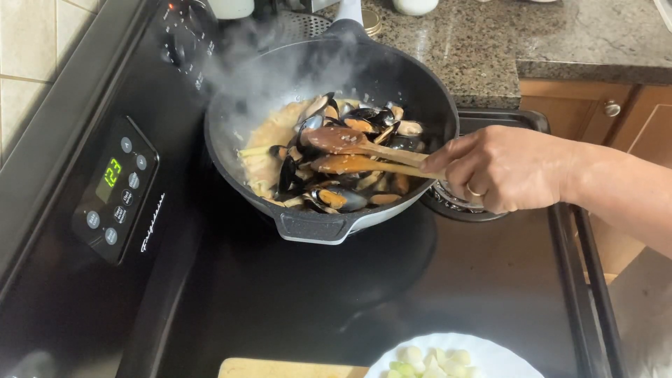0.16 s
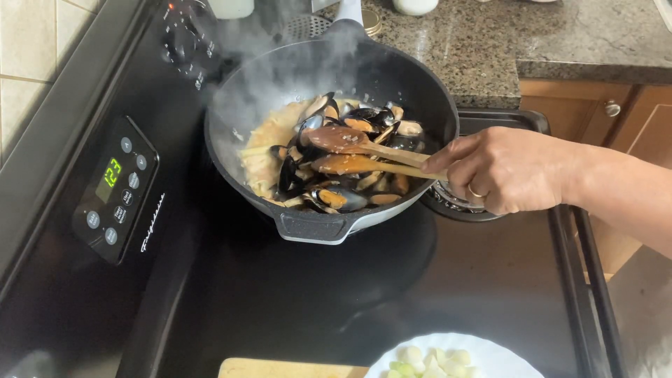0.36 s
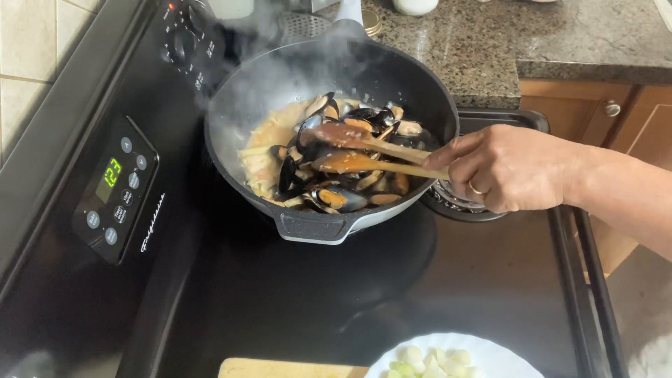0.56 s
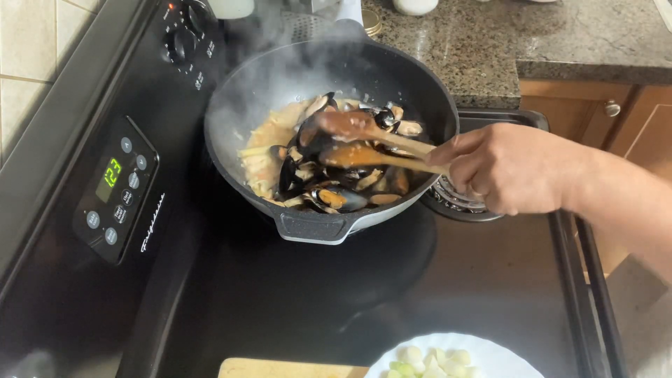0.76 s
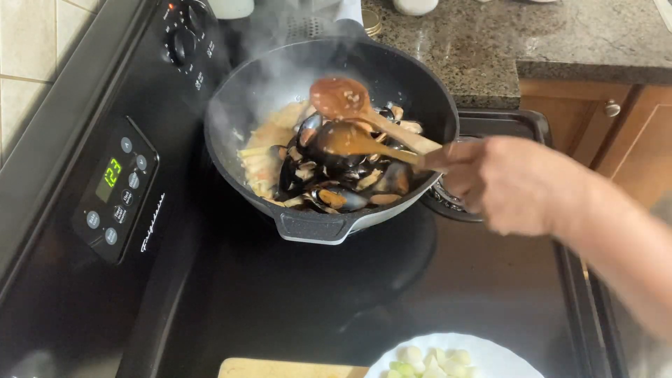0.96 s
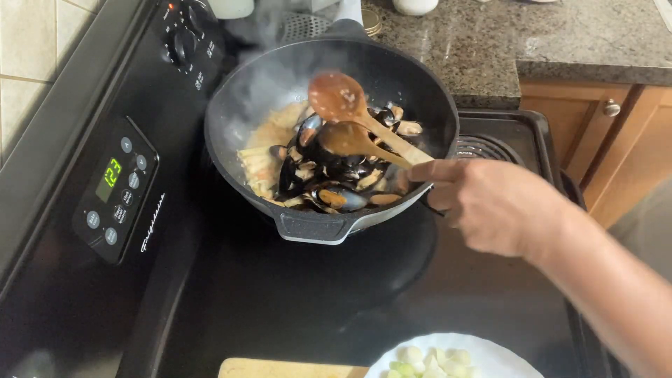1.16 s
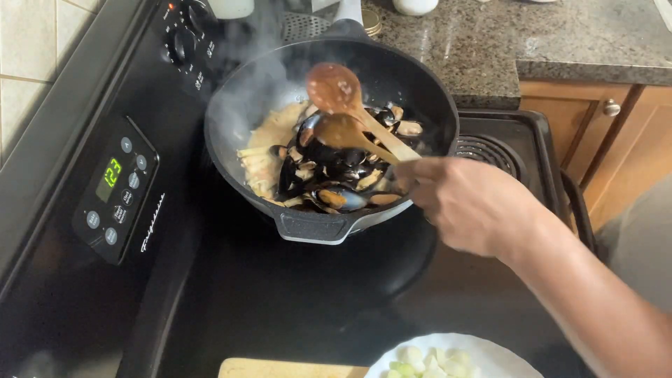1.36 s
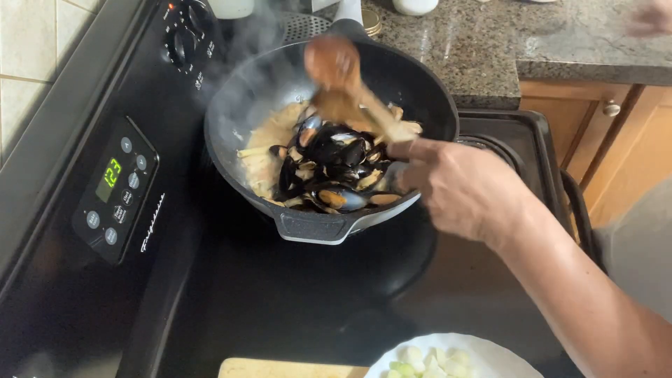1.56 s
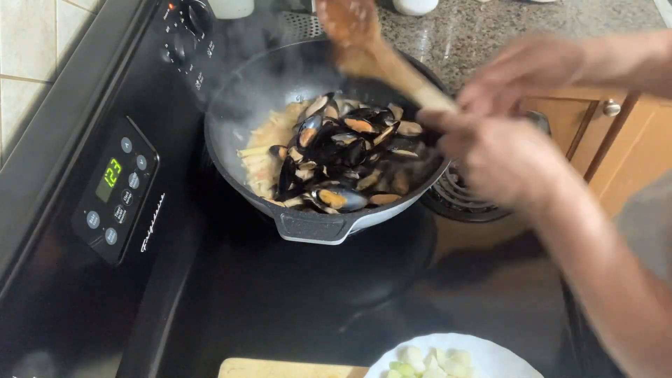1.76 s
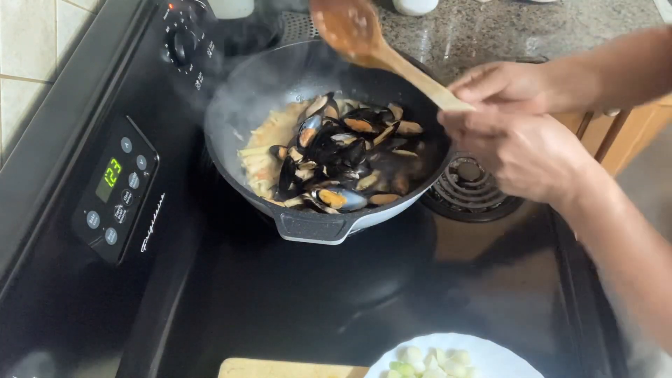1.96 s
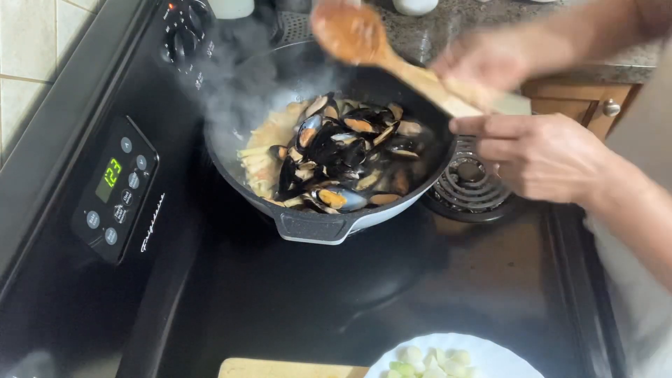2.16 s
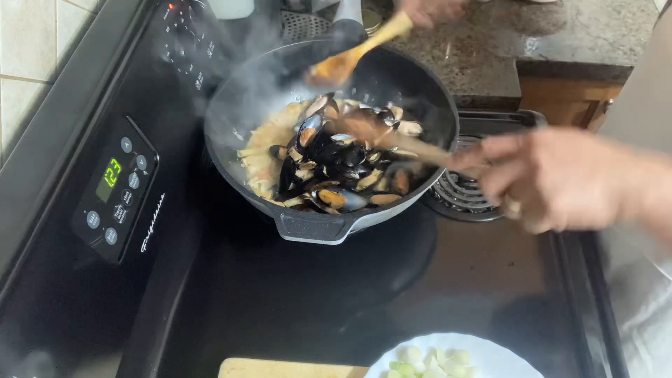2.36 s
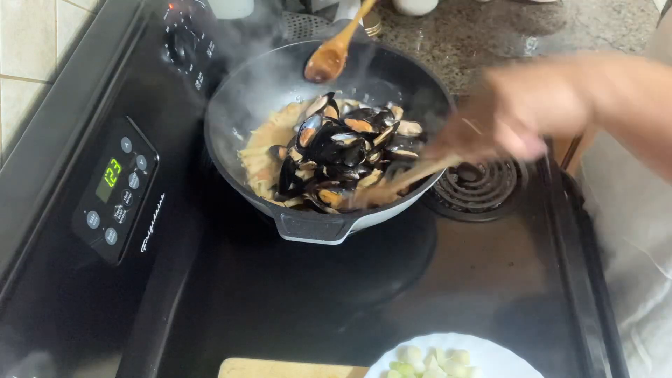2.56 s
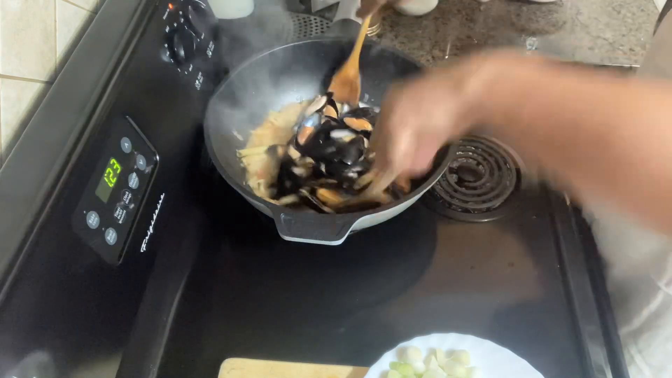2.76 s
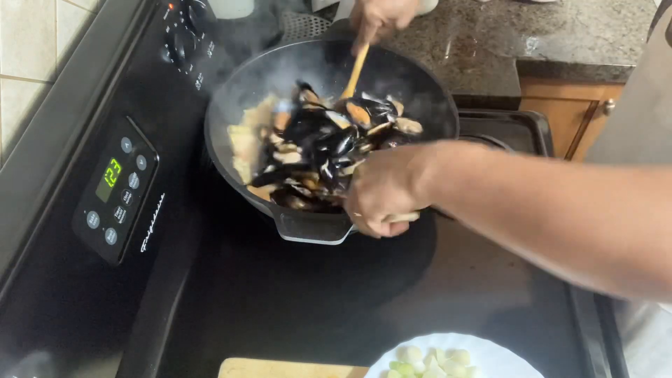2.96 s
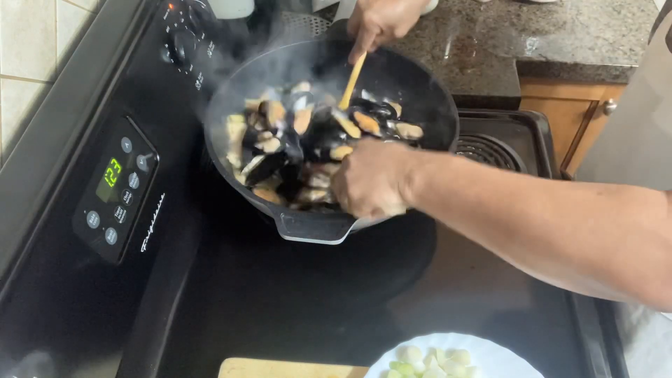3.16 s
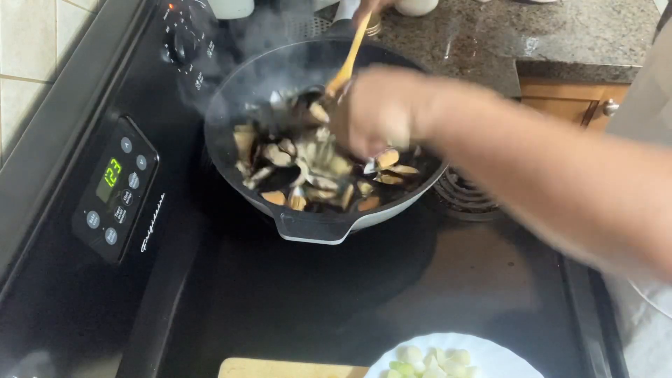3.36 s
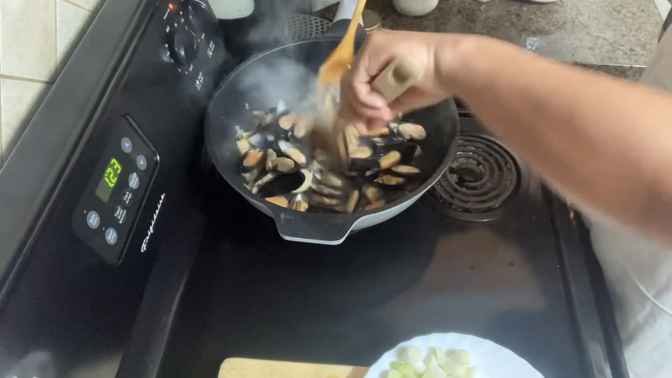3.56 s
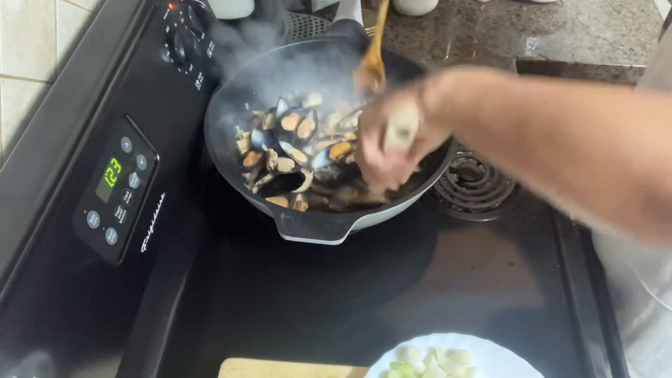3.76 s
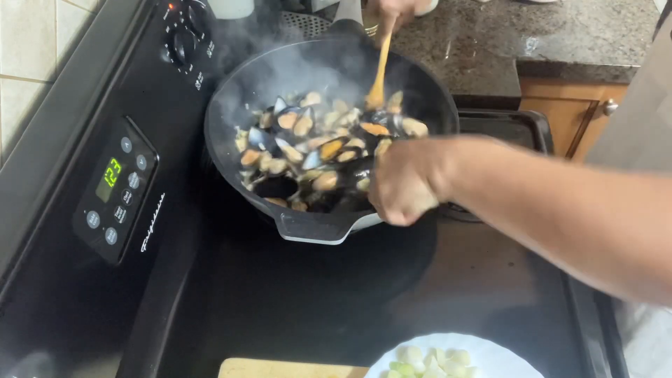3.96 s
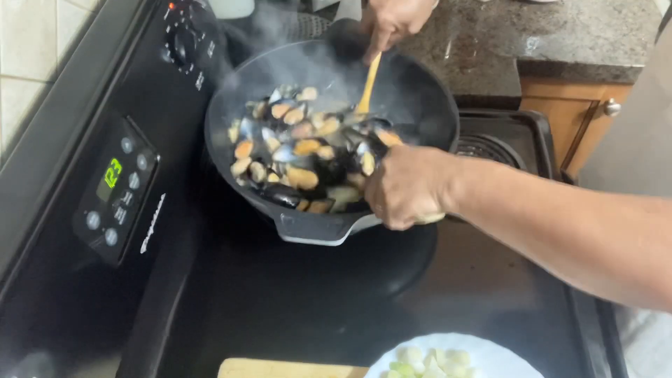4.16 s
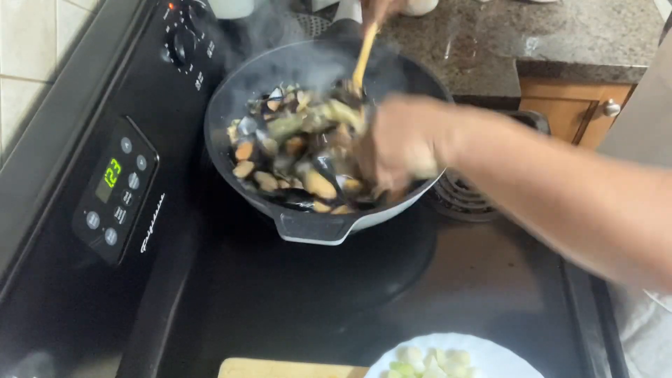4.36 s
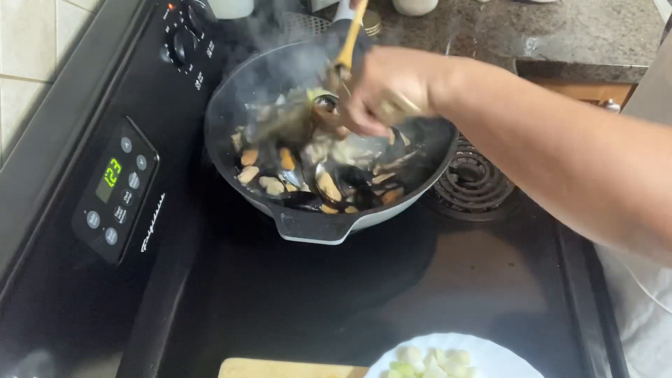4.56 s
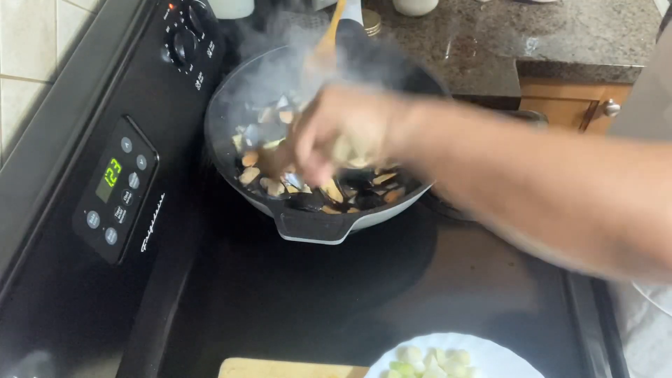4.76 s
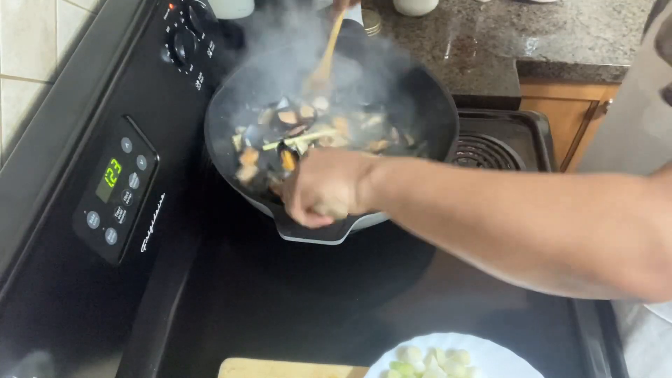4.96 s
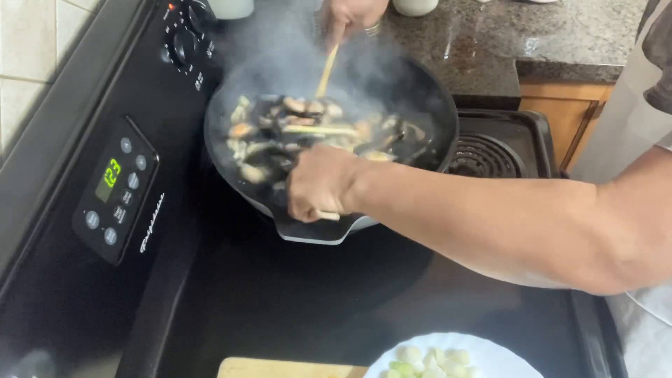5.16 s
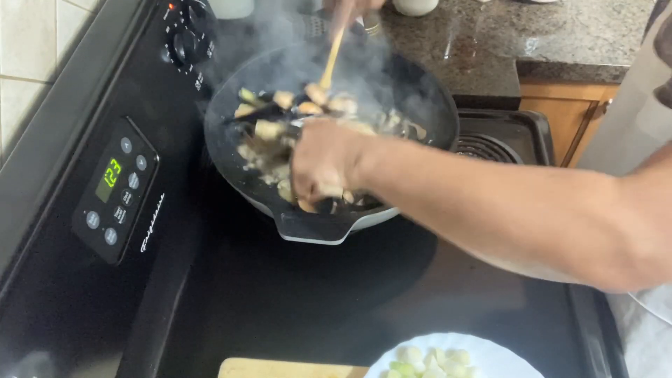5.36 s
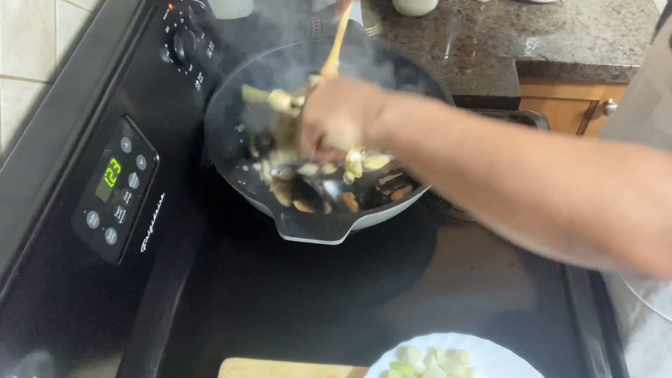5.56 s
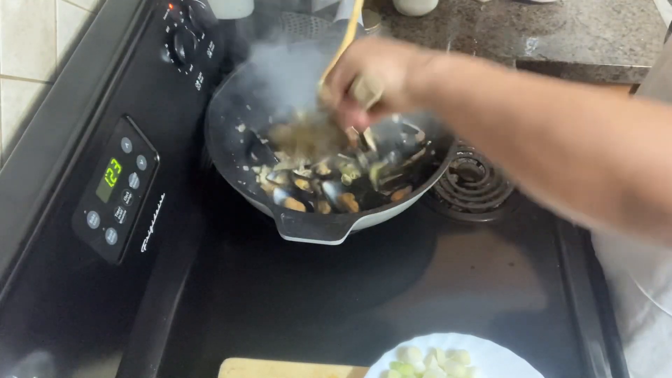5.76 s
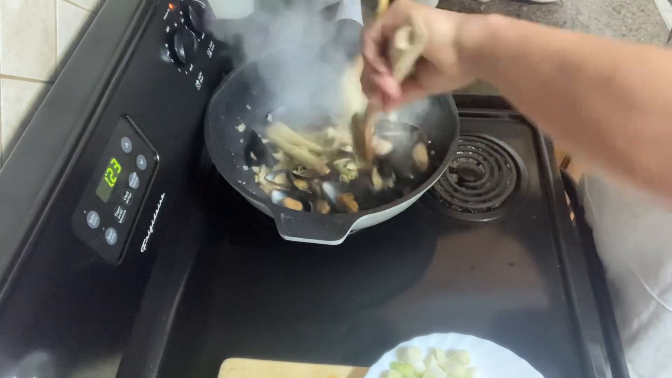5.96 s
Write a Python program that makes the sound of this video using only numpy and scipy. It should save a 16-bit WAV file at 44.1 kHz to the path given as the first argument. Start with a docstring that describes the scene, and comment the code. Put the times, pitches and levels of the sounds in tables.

```python
"""Mussel shells are stirred with wooden spoons in a wok in a small kitchen; the broth simmers throughout.
First a cupboard door is knocked, squeaks on its hinge and bangs shut; dishes ring, then drops spit.
Then spoons strike the wok, shells clack and grind, broth sloshes and the wok thuds on the stove.
Struck things are sums of dying sine waves; grinding and simmering are built from clicks and noise.
Two spaced microphones hear it all, close sounds drier than the door."""
import sys
import numpy as np
from scipy import signal
from scipy.fft import rfft, irfft, next_fast_len
from scipy.io import wavfile
from scipy.ndimage import uniform_filter1d

SR = 44100
rng = np.random.default_rng(int(sys.argv[2]) if len(sys.argv) > 2 else 0)


def dump_mix(stems):
    """Bounce the given channels to the path in sys.argv[1] as a 16-bit WAV at rate SR."""
    frames = np.atleast_2d(stems).T  # one column per channel
    limited = np.clip(frames, -1, 1)  # hard clip at full scale
    pcm = np.round(limited * 32767).astype(np.int16)
    wavfile.write(sys.argv[1], SR, pcm)


def ratio_of_db(decibels):
    """Turn decibels (scalar or array-like) into linear amplitude factors; 0 dB maps to 1."""
    return 10 ** (np.asarray(decibels, float) / 20)


N = 265614  # length in samples

# Shell striking shell: start_s, level_db, body_db (below 2.5 kHz), edge_db (above 6 kHz),
# ring_hz (strongest ring)
CLACKS = [(2.653, -30.5, 3, -1, 4380), (2.6826, -31.5, -4, 0, 2300), (2.7551, -26.5, -6, -9.5, 2800),
          (2.8873, -31, -14, -0.5, 1133), (2.9564, -35.5, 8.5, -30, 2000), (3.0014, -31, 1, -15, 1153),
          (3.018, -29, 1, -9, 2980), (3.039, -23.5, -2, -5.5, 1660), (3.0887, -28.5, -5, -16, 1450),
          (3.1404, -22, 0, -1, 5400), (3.2375, -31, -1, -20, 2120), (3.267, -28, 1, -3.5, 1920),
          (3.3042, -30, -8, 2, 2800), (3.313, -27.5, -7, 0, 4370), (3.3948, -32.5, -4.5, -5, 1430),
          (3.419, -24, -4, -12, 1702), (3.457, -38, -1, 4.5, 3670), (3.5488, -16, -10, -17, 3020),
          (3.5503, -12, -4.5, 0.5, 3940), (3.5764, -23, 0, -7, 4270), (3.5962, -26.5, -7, 1, 4220),
          (3.6551, -9.5, -7.5, -10, 960), (3.6641, -9, -3.5, -17, 1202), (3.68, -7, -6, -26, 3716),
          (3.7254, -15, -3.5, -1.5, 2570), (3.8093, -29, 3, -2.5, 1760), (3.8477, -30, -2, -4, 2600),
          (3.8625, -28, 2, -38, 2400), (3.9326, -25.5, 1, -8, 1680), (3.9534, -34, 1, -19, 1610),
          (4.0707, -21, -2, -2, 7700), (4.094, -34.5, 0, -11, 2250), (4.2459, -16.5, -10, -0.5, 5350),
          (4.256, -8, -6.5, 2.5, 4400), (4.3, -24, -16, -2, 5000), (4.3325, -22.5, -2, -12, 2620),
          (4.3388, -26.5, -15, 4.5, 4730), (4.374, -27.5, 0.5, 1, 1280), (4.398, -12.5, -9.5, -7.5, 5530),
          (4.4047, -21, -22, -16, 2800), (4.4478, -12, -19, 8, 8370), (4.4596, -17, -3.5, -17, 7400),
          (4.5067, -25, -24, -32, 4290), (4.5614, -29, -6, -12, 1760), (4.62, -31, 3, 6, 3270),
          (4.6591, -12, -5, 2, 8170), (4.73, -19, -3, -9, 2920), (4.7814, -24.5, -1, -8, 910),
          (4.788, -9, -9.5, -26, 2260), (4.8752, -23, 0, -8.5, 1920), (4.8988, -26.5, 3.5, -8, 2520),
          (4.9354, -20, -3, -17, 1780), (5.0192, -25, -5.5, -1, 1240), (5.0677, -30, 4, -9, 1870),
          (5.1857, -38, 2, -2, 945), (5.1986, -32, -21, -1, 1420), (5.219, -9.5, -43, -6, 8270),
          (5.2284, -28.5, 9, -4, 4480), (5.2984, -17, -6, 2.5, 7530), (5.3153, -15.5, -7.5, -7, 8200),
          (5.3584, -12.5, -3.5, 2, 4540), (5.4138, -20.5, -2, -9, 1570), (5.4226, -10.5, -29, 4, 4970),
          (5.5478, -12.5, -7.5, 2, 4700), (5.686, -30, -4.5, -12, 1620), (5.7114, -29, -12, -12, 3680),
          (5.8036, -30, -9, 0, 8500), (5.899, -29.5, -5.5, -6.5, 1240), (5.9975, -32, -5, -0.5, 4350),
          (3.4968, -25, -1, 11.5, 11500)]


def rms_one(x):
    """Scale a signal to an rms (average strength) of 1."""
    return x / np.sqrt(np.mean(x ** 2) + 1e-20)


def at_hz(points, hz):
    """Read a curve between its points, on a log-frequency axis."""
    p = np.array(points, float)
    return np.interp(np.log(np.maximum(hz, 1)), np.log(p[:, 0]), p[:, 1])


def in_time(rows):
    """Read a table's columns at every sample, and add a gate that is open during its time span."""
    s, *columns = np.transpose(rows)
    t = np.arange(N) / SR
    opening = np.clip((t - s[0]) / 0.024, 0, 1)
    closing = np.clip((s[-1] + 0.037 - t) / 0.018, 0, 1)
    return [np.interp(t, s, c) for c in columns] + [opening * closing]


def coloured(x, spectrum):
    """Filter a signal by a curve of level over pitch; the result has rms 1."""
    size = x.shape[-1]
    gain = ratio_of_db(at_hz(spectrum, np.fft.rfftfreq(size, 1 / SR)))
    return rms_one(irfft(rfft(x) * gain, size))


def spread(mid, side):
    """Make left and right from two unrelated signals, as alike as is set for each pitch."""
    # How alike the two channels are, the top treble almost one signal: pitch_hz, likeness (0 to 1)
    likeness = [(60, .99), (250, .6), (500, .75), (1000, .5), (2000, .4), (4000, .45), (6600, .5),
                (7700, 1)]
    size = len(mid)
    alike = np.clip(at_hz(likeness, np.fft.rfftfreq(size, 1 / SR)), 0, 1)
    shared = rfft(mid) * np.sqrt((1 + alike) / 2)
    opposed = rfft(side) * np.sqrt((1 - alike) / 2)
    return irfft([shared + opposed, shared - opposed], size)


def grains(per_s, size_db):
    """Random clicks of uneven size and random sign."""
    born = rng.random(N) < per_s / SR
    size = ratio_of_db(size_db * np.minimum(rng.exponential(1, N), 5))
    return born * size * rng.choice([-1, 1], N)


def add(out, s, sound):
    """Mix a short sound in at time s."""
    i = round(s * SR)
    out[..., i:i + sound.shape[-1]] += sound[..., :N - i]


def struck(hz, level_db, t60, phase, attack_s):
    """Modes (ways a thing vibrates) ring after a contact; each falls 60 dB in its t60 seconds."""
    hz, level_db, t60, phase = np.atleast_1d(hz, level_db, t60, phase)
    t = np.arange(round(.6 * SR)) / SR
    t = t[:round(np.max(t60) * SR)]
    decay = ratio_of_db(level_db[:, None] - 60 * t / t60[:, None])
    modes = decay * np.sin(2 * np.pi * hz[:, None] * t + phase[:, None])
    return modes.sum(axis=0) * (1 - np.exp(-t / attack_s))


def swells(s, db, rise_s, t60):
    """Gain curve of events that rise and die away, summed as power."""
    t, power = np.arange(SR) / SR, np.zeros(N)
    shape = ratio_of_db(-60 * t / t60) * (1 - np.exp(-t / rise_s))
    for at, level_db in zip(s, db):
        add(power, at, (ratio_of_db(level_db) * shape / shape.max()) ** 2)
    return np.sqrt(power)


def shells():
    """Every shell has its own dense set of modes; the high ones die first, and the contact chatters."""
    out = np.zeros(N)
    ladder = np.linspace(700 ** .6, 16000 ** .6, num=170) ** (1 / .6)
    chance = rng.standard_normal((len(CLACKS), 4, 170))
    for (s, clack_db, low_db, top_db, ring_hz), (pitch, strength, phase, chatter) in zip(CLACKS, chance):
        hz = ladder * np.exp(.02 * pitch)
        air_db = top_db - 5 + 0.5 * np.clip(top_db, 0, 15)  # the sharpest contacts reach highest
        shape = [(700, low_db - 7), (1500, low_db), (4000, 0), (8500, top_db), (15000, air_db)]
        t60 = 0.044 * (hz / 4000) ** -.2

        # Modes close to the strongest ring are louder: a narrow hump on a broad one
        distance = np.log(hz / ring_hz)
        hump_db = 7 * np.exp(-(distance / 0.016) ** 2) + 5 * np.exp(-(distance / 0.46) ** 2)
        mode_db = clack_db - 16 + at_hz(shape, hz) + hump_db + 2.05 * strength
        ring = struck(hz, mode_db, t60, 2 * phase, attack_s=0.00059)
        add(out, s, ring)

        # The strongest ring stands out at first and dies within 45 cycles;
        # small thin shells ping harder, by 2 dB per octave
        ping_db = clack_db + 5 + at_hz(shape, ring_hz) + 2 * np.log2(ring_hz / 4000)
        add(out, s, struck(ring_hz, ping_db, 45 / ring_hz, 0, attack_s=0.0004))

        # A second, weaker contact 4 ms or more later
        again_s = s + .004 * (1 + abs(chatter[0]))
        add(out, again_s, ratio_of_db(-7.5) * ring * np.sign(chatter[1]))
    return out


def wok():
    """Each spoon blow is a short wooden knock that rings the wok's modes with strengths of its own."""
    # Spoon striking wok: start_s, level_db
    blows = [(2.531, -23), (2.55, -15.5), (3.139, -29), (3.656, -16), (3.681, -10.5), (3.729, -27),
             (3.93, -39), (4.254, -28), (4.398, -27.5), (4.788, -14.5), (4.873, -54), (4.936, -24.5),
             (5.359, -20.5)]
    # Ringing modes of the metal wok: pitch_hz, level_db, t60_s
    wok_modes = [(145, -5, 0.11), (278, -6, 0.11), (428, -17.5, 0.47), (512, 7, 0.024), (772, -2.5, 0.11),
                 (857, 6.5, 0.11), (1240, 1.5, 0.1), (1343, -10, 0.06), (1580, -53, 0.047),
                 (2074, -26, 0.055), (2200, -78, 0.06)]
    # Spectrum of the wooden knock: pitch_hz, level_db
    knock_spectrum = [(400, -17), (900, -3.5), (2200, 8.5), (4000, -5), (7000, -24), (15000, -60)]
    out, t = np.zeros(N), np.arange(3000) / SR
    hz, level_db, t60 = np.transpose(wok_modes)
    for (s, blow_db), noise in zip(blows, rng.standard_normal((len(blows), len(t)))):
        strength, phase = noise[:len(hz)], noise[-len(hz):]
        mode_db = blow_db - 9 + level_db + 1.5 * strength
        add(out, s, struck(hz, mode_db, t60, 2 * phase, attack_s=0.0024))
        knock = coloured(noise, knock_spectrum)
        add(out, s, ratio_of_db(blow_db - 12 - 60 * t / 0.17) * knock)
    return out


def grinding():
    """Shells rub in clumps of small ringing ticks, edges scratch, and shells slither on after a clack."""
    # Spoons push the heap: start_s, level_db (pressure, as loudness of grinding),
    # ring_hz (main ring of the shells in touch)
    pushes = [(2.55, -56, 1080), (2.61, -64, 1010), (2.66, -41.5, 2470), (2.85, -34.5, 1160),
              (2.96, -39.5, 1900), (3.17, -36, 1270), (3.33, -43.5, 2570), (3.42, -40, 1500),
              (3.56, -33, 3000), (3.65, -39.5, 1180), (3.81, -34.5, 2200), (4.19, -40.5, 1570),
              (4.24, -38, 2560), (4.99, -41, 1710), (5.51, -41, 1620), (5.53, -34, 2580), (5.92, -74, 1290),
              (6.02, -38.5, 1890)]
    # Spectrum of the ringing ticks: pitch_hz, level_db
    tick_spectrum = [(500, -5), (900, -1), (1600, -5), (3000, 1.5), (5500, 2.5), (7500, 0), (15000, -42)]
    # Spectrum of the scratching edges: pitch_hz, level_db
    edge_spectrum = [(3000, -54), (5000, 5), (7000, 0), (10000, 2.5), (15000, -14)]
    grind_db, ring_hz, gate = in_time(pushes)
    clumps = ratio_of_db(3.7 * rms_one(uniform_filter1d(rng.standard_normal(N), size=700)))

    rub = np.zeros((2, N))
    for k, hz in enumerate(np.geomspace(700, 6500, num=14)):  # shells of many sizes are in touch
        nearness_db = -9 * np.minimum(np.abs(np.log2(hz / ring_hz)), 1.2)
        ticks = grains(300 * clumps, size_db=2.5) * ratio_of_db(nearness_db + at_hz(tick_spectrum, hz))
        modes = hz * np.exp(.1 * rng.standard_normal(7))
        ring = struck(modes, np.zeros(7), np.full(7, .02), modes, attack_s=0.00076)
        rub += signal.fftconvolve(ticks, ring)[:N] * [[1], [(-1) ** k]]
    rub /= np.sqrt(uniform_filter1d(rub[0] ** 2, size=SR // 2) + 1e-20)  # even out slow level changes

    scratches = grains(2500 * clumps, size_db=4.5) + rng.standard_normal((2, N)) * 2.0
    edge = coloured(scratches, edge_spectrum)
    s, clack_db, _, top_db, _ = np.transpose(CLACKS)
    settling = swells(s, clack_db + top_db - 17, rise_s=0.0083, t60=0.24)  # sharp clacks settle louder
    grind = gate * ratio_of_db(grind_db)
    return grind * spread(*rub) + np.hypot(ratio_of_db(-12) * grind, settling) * spread(*edge)


def sloshing():
    """A spoon digs in and the broth sloshes: low noise that swells and dies away."""
    # Sloshes: start_s, level_db
    sloshes = [(2.53, -37.5), (2.75, -46.5), (3.651, -34), (3.8, -49), (4.1, -44), (4.781, -37.5),
               (4.9, -40), (5.08, -47.5), (5.55, -52)]
    # Spectrum of the sloshing: pitch_hz, level_db
    slosh_spectrum = [(60, -77), (100, 2), (140, 2.5), (250, -1), (500, -19), (900, -32)]
    noise = coloured(rng.standard_normal((2, N)), slosh_spectrum)
    return swells(*np.transpose(sloshes), rise_s=0.01, t60=0.92) * spread(*noise)


def wok_thuds():
    """The wok shifts on the stove top: short swells of deep noise, the same in both channels."""
    # Thuds: start_s, level_db
    thuds = [(2.54, -50), (3.02, -55), (3.37, -53), (3.8, -46), (4.11, -41), (4.2, -44), (4.66, -57),
             (4.9, -48), (5.05, -52), (5.16, -48), (5.56, -49)]
    # Spectrum of a thud: pitch_hz, level_db
    thud_spectrum = [(30, -19), (48, 18), (62, 23), (90, -15), (150, -55)]
    noise = coloured(rng.standard_normal(N), thud_spectrum)
    return swells(*np.transpose(thuds), rise_s=0.01, t60=0.2) * noise


def door():
    """Each bang rings the wooden panel, a harder one its upper modes, and rattles the frame."""
    # Door on frame: start_s, level_db, hardness_db (per octave), rattle_db, rattle_t60_s
    bangs = [(.018, -29, 15, 13, 0.1), (.027, -22.5, 12, 4, 0.3), (.228, -10, 2.5, -6.5, 0.18),
             (.251, -11.5, 1, -7.5, 0.4), (0.286, -34.5, -10, -24, 0.39), (0.518, -22, -6, 1.5, 0.55),
             (.54, 3, -2, -7, 0.41), (.551, -6, -6, 3, 0.31), (.602, -22.5, -1, -11, 0.2),
             (0.654, -39, 17.5, 27, 0.12)]
    # Modes of the panel: pitch_hz, level_db, t60_s (before the cap of 0.18 s below)
    panel_modes = [(61.4, -11.5, 0.05), (128, -13.5, 0.1), (209.6, -11, 0.16), (263.1, -1, 0.28),
                   (302, -11, 0.29), (350, -7.5, 0.28), (425, -8, 0.22), (472.4, -3, 0.2),
                   (487, -8.5, 0.31), (553, 1.5, 0.05), (575.4, 8, 0.089), (665, -21, 0.099),
                   (747, -6, 0.061), (796, -9, .12), (842, -1, 0.063), (918, -3, 0.087), (1110, -13, 0.11),
                   (1383, -22, 0.17), (1637, -11.5, 0.089), (2080, -11.5, 0.14), (2480, -33, 0.065),
                   (2920, -39, 0.11), (3950, -30, 0.05), (5000, -17, 0.082)]
    # Spectrum of the rattling parts: pitch_hz, level_db
    rattle_spectrum = [(60, -8), (300, -18), (1000, -9), (2600, 1.5), (5000, -5.5), (9000, -11),
                       (15000, -20)]
    panel, rattle, t = np.zeros(N), np.zeros((2, N)), np.arange(round(.4 * SR)) / SR
    hz, level_db, t60 = np.transpose(panel_modes)
    chance = rng.standard_normal((len(bangs), 2, len(t)))
    for (s, bang_db, hard_db, rattle_db, rattle_t60), noise in zip(bangs, chance):
        strength, phase = noise[:, :len(hz)]
        tilt_db = hard_db * np.log2(np.minimum(hz, 1700) / 500)
        mode_db = bang_db - 12 + level_db + tilt_db + 3.2 * strength
        ring = struck(hz, mode_db, np.minimum(t60, .18), 2 * phase, attack_s=0.00081)
        # The panel shudders against the frame
        wobble = rms_one(uniform_filter1d(noise[1, ::-1], size=350))[:len(ring)]
        add(panel, s, ring * ratio_of_db(3.56 * wobble))

        dying = ratio_of_db(bang_db - 5 + rattle_db - 60 * t / max(rattle_t60, .03))
        dying = dying * (1 - np.exp(-t / 0.0044))
        # Loose parts chatter
        dying = dying * ratio_of_db(1.3 * rms_one(uniform_filter1d(noise[0, ::-1], size=300)))
        # Each bang favours some pitches by chance
        parts_hz = np.geomspace(60, 15000, num=50)
        parts_db = at_hz(rattle_spectrum, parts_hz) + 3 * noise[0, 100:150]
        parts = coloured(noise, np.transpose([parts_hz, parts_db]))
        add(rattle, s, spread(*parts) * dying)
    return panel, rattle


def hinge():
    """Stick-slip squeak: partials that bend as the door swings, each fluttering on its own."""
    # Loudness of the squeak: start_s, level_db, top_partial_db
    squeak = [(.26, -27, 22), (.31, -42, 7.5), (.36, -40, 11), (.41, -42.5, 8), (.46, -45, -26),
              (.5, -42, -18), (.53, -43, -16)]
    # Partials (single tones) of the squeak: start_hz, end_hz, level_db
    partials = [(530, 625, -3), (725, 905, 0), (1095, 1230, -3), (1450, 1650, -2), (2300, 2050, -14)]
    level_db, top_db, gate = in_time(squeak)
    # The door gathers speed from 0.26 s on and swings for 0.27 s
    travel = np.clip((np.arange(N) / SR - .26) / .27, 0, 1) ** 2.3
    wobble = rms_one(uniform_filter1d(rng.standard_normal((2, len(partials), N)), size=600))
    lines = []
    for (start_hz, end_hz, db), pitch, flutter in zip(partials, *wobble):
        hz = (start_hz + travel * (end_hz - start_hz)) * (1 + .006 * pitch)
        lines.append(ratio_of_db(db + 3 * flutter) * np.sin(2 * np.pi * np.cumsum(hz) / SR))
    return ratio_of_db(level_db + 3) * gate * (sum(lines[:-1]) + ratio_of_db(top_db) * lines[-1])


def dishes():
    """Shaken dishes ring briefly, each with a single mode."""
    # Rings of the dishes: start_s, pitch_hz, level_db, t60_s
    dish_rings = [(.63, 2945, -29, .25), (.645, 2450, -30, .15), (.69, 3690, -30, .2)]
    out = np.zeros(N)
    for s, hz, db, t60 in dish_rings:
        add(out, s, struck(hz, db, t60, 0, attack_s=0.0043))
    return out


def spitting():
    """Drops spit from the broth: very short bursts of brightened noise."""
    # Spits: start_s, level_db
    spits = [(0.924, -32), (1.005, -32), (1.146, -25), (1.2014, -51), (1.3172, -54), (1.5352, -41),
             (1.7412, -49), (1.9537, -34), (2.3428, -50)]
    out, t = np.zeros(N), np.arange(600) / SR
    for (s, db), noise in zip(spits, rng.standard_normal((len(spits), len(t)))):
        bright = signal.lfilter([1, -.5], [1], noise)
        add(out, s, ratio_of_db(db - 15 - 60 * t / .03) * bright)
    return out


def simmer():
    """Small bubbles burst in the broth, each click ringing at its own pitch, over an uneven hiss."""
    # Spectrum of the hiss: pitch_hz, level_db
    hiss_spectrum = [(30, -34), (59, -9), (175, -7.5), (245, 0), (334, -14.5), (395, -3), (520, -11),
                     (848, -7.5), (1050, -9), (1200, -5.5), (2310, -13), (5000, -23), (9000, -27.5),
                     (12000, -30), (15000, -44)]
    pops = grains(900, size_db=3.5)
    pitches = np.geomspace(250, 2600, num=16)
    dealt = rng.integers(0, 16, N)  # which pitch each pop gets
    bubbles = 0
    for k, hz in enumerate(pitches):
        r = ratio_of_db(-60 * hz / (12 * SR))  # dies in about twelve cycles
        w = 2 * np.pi * hz / SR
        clicks = np.sin(w) * pops * (dealt == k) + 1e-18
        bubbles = bubbles + signal.lfilter([np.sqrt(1 - r)], [1, -2 * r * np.cos(w), r * r], clicks)
    hiss = spread(*coloured(rng.standard_normal((2, N)), hiss_spectrum))
    hiss = hiss * ratio_of_db(1.3 * rms_one(uniform_filter1d(rng.standard_normal(N), size=2500)))  # swells unevenly
    return ratio_of_db(-44.5) * (hiss + ratio_of_db(-9.5) * rms_one(bubbles))


def nearby(x):
    """Hob, wall and hands scatter a close sound differently to the two microphones."""
    scatter = rng.standard_normal(600) * ratio_of_db(-60 * np.arange(600) / SR / .015)
    scatter = scatter / np.sqrt(np.sum(scatter ** 2))
    return spread(x, signal.fftconvolve(x, scatter)[:N])


def kitchen(x):
    """Diffuse reverberation: octave bands of noise, each dying at its own rate."""
    # How long the room rings: pitch_hz, t60_s
    room_t60 = [(200, .3), (1000, .35), (4000, .3), (12000, .2)]
    t, tail = np.arange(round(.5 * SR)) / SR, 0
    for low in 60 * 2. ** np.arange(8):
        band = signal.butter(2, [low, 2 * low], "band", fs=SR, output="sos")
        noise = signal.sosfilt(band, rng.standard_normal((2, len(t))))
        tail = tail + noise * ratio_of_db(-60 * t / at_hz(room_t60, 1.2 * low))
    tail = spread(*tail) * (1 - np.exp(-(t / 0.0022) ** 2))
    tail = tail / np.sqrt(np.sum(tail ** 2) / 2)
    return signal.fftconvolve([x], tail, axes=1)[:, :N]


def scene():
    """Struck things sound directly and through the room; the door is farther off and wetter."""
    panel, rattle = door()
    near = shells() + wok() + dishes() + spitting()
    far = panel + hinge()
    direct = nearby(near + ratio_of_db(-1.5) * far) + rattle
    room = kitchen(ratio_of_db(-9) * near + ratio_of_db(-1) * far)
    stirring = grinding() + sloshing() + wok_thuds()
    return direct + room + stirring + simmer()


def channel_differences(dry):
    """Shift phase and level between left and right by an amount set for each pitch."""
    # Phase between channels, moving in half-turn steps in the treble: pitch_hz, left_leads (half turns)
    left_leads = [(0, 0), (600, 0), (3000, .7), (4200, 0), (6300, -1), (7800, -2), (8900, -2), (9700, -3),
                  (10950, -3), (11600, -4), (13000, -4), (13300, -5), (15150, -5), (15300, -6)]
    # Level between channels: pitch_hz, left_louder_db
    left_louder = [(60, -2), (180, 1.5), (550, 1), (1650, 2.5), (4500, 1.5), (7700, 0)]
    size = next_fast_len(N + 4096)
    hz, (at, lead) = np.fft.rfftfreq(size, 1 / SR), np.transpose(left_leads)
    # Half of each difference goes to the left, the opposite half to the right
    half = ratio_of_db(at_hz(left_louder, hz) / 2) * np.exp(.5j * np.pi * np.interp(hz, at, lead))
    return irfft(rfft(dry, size) * [half, 1 / half], size)[:, :N]


def gain_control(pair):
    """Peaks above -15 dB pull the gain down by 0.29 of the excess; it recovers at a steady rate."""
    over_db = np.maximum(20 * np.log10(np.abs(pair).max(axis=0) + 1e-9) + 15, 0)
    ramp = 25.5 * np.arange(N) / SR  # recovery, dB per second
    held_db = np.maximum.accumulate(0.29 * over_db + ramp) - ramp
    keep = np.exp(-1 / (0.0062 * SR))  # smoothed over 6.2 ms
    return pair * ratio_of_db(-signal.lfilter([1 - keep], [1, -keep], held_db))


def low_pass(x):
    """Removes everything above the highest recorded frequency."""
    return signal.sosfilt(signal.butter(12, 16970, fs=SR, output="sos"), x)


def record(dry):
    """Channel differences, a deep-bass cut, gain control, rounded peaks and a cut of the highest treble."""
    pair = channel_differences(dry)
    pair = signal.sosfilt(signal.butter(4, 45, "high", fs=SR, output="sos"), pair)
    pair = gain_control(pair)
    pair = .92 * np.tanh(pair / .92)  # peaks are rounded
    pair = signal.sosfilt(signal.cheby2(10, 50, 16180, fs=SR, output="sos"), pair)
    return low_pass(pair)


dry = scene()
out = record(dry)
dump_mix(out)
```